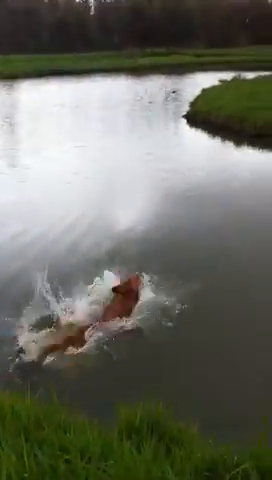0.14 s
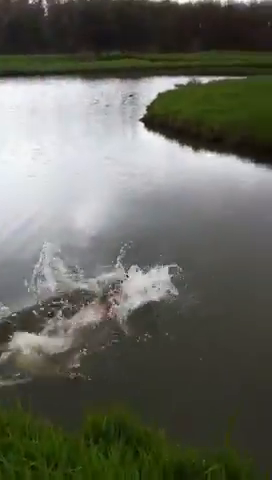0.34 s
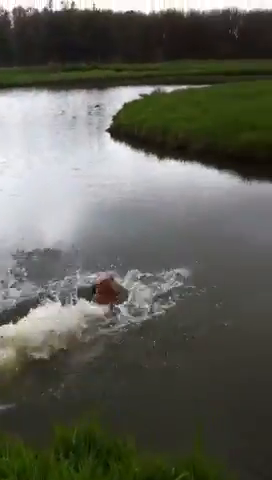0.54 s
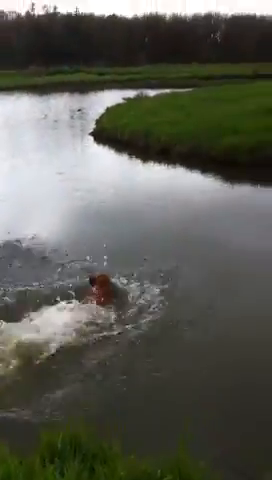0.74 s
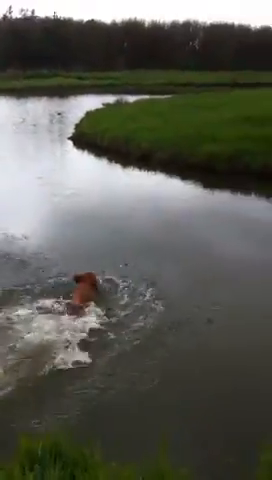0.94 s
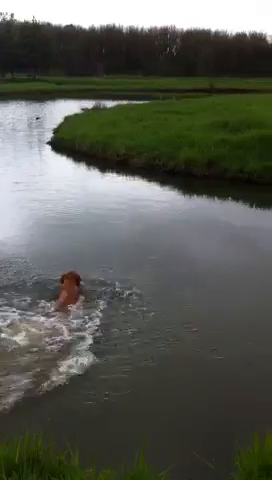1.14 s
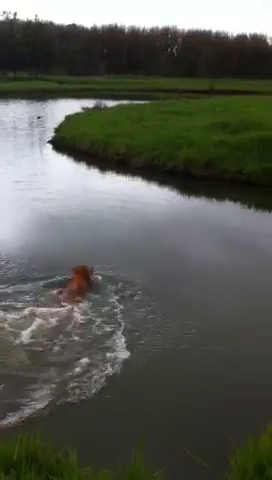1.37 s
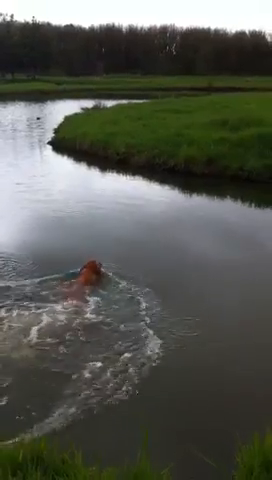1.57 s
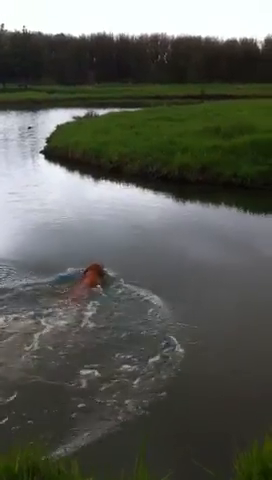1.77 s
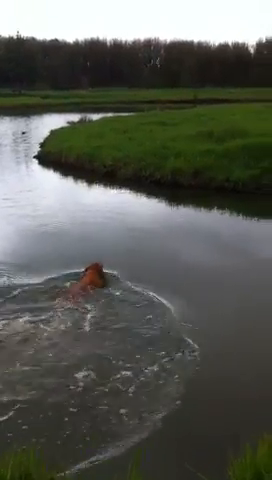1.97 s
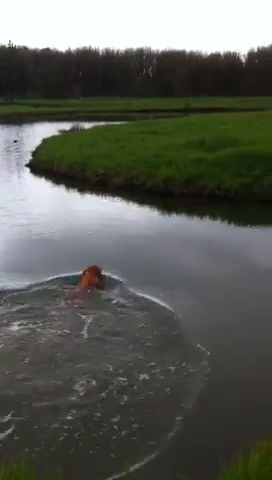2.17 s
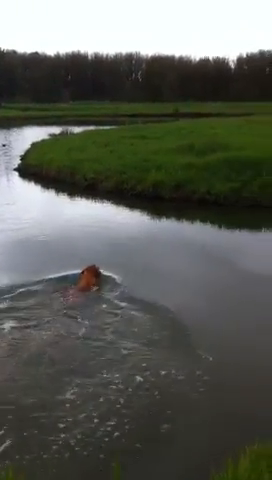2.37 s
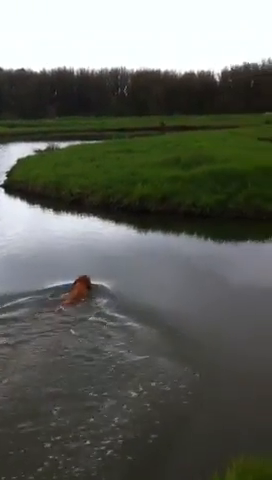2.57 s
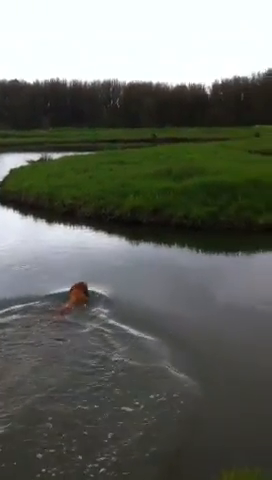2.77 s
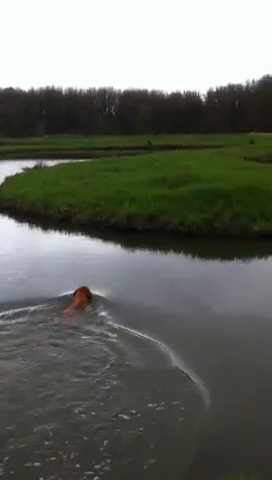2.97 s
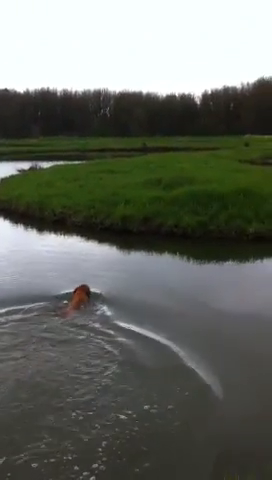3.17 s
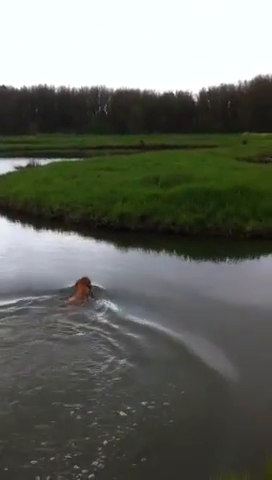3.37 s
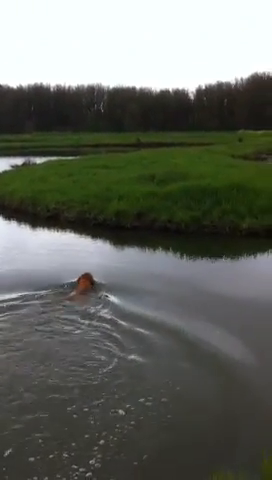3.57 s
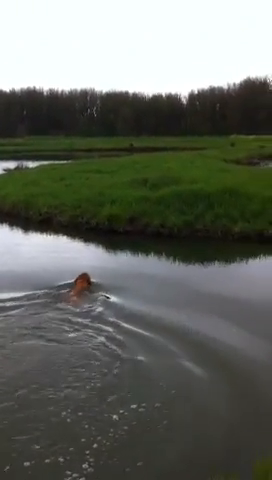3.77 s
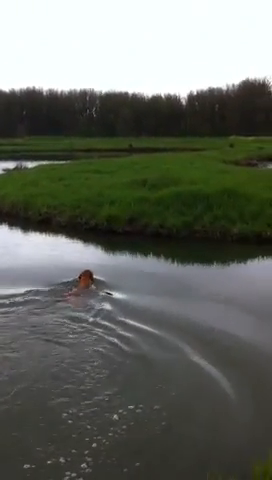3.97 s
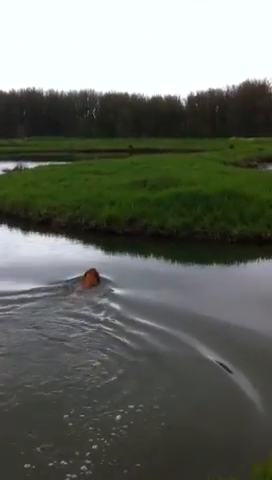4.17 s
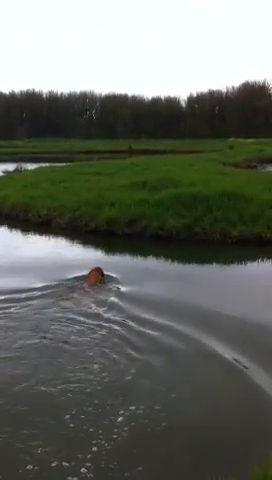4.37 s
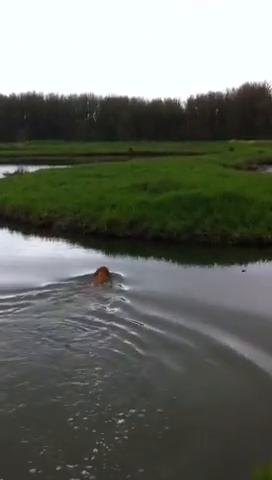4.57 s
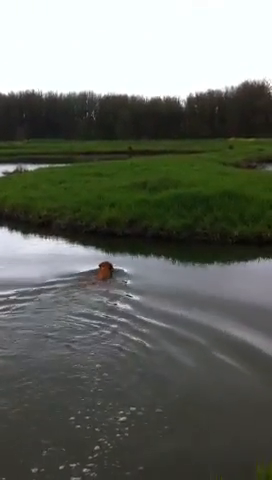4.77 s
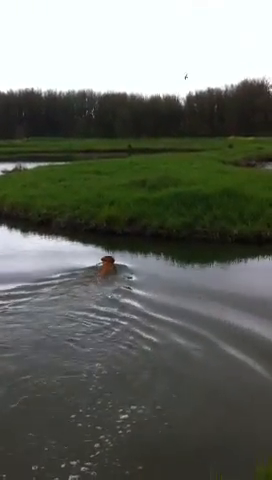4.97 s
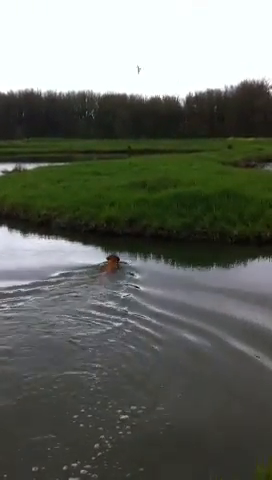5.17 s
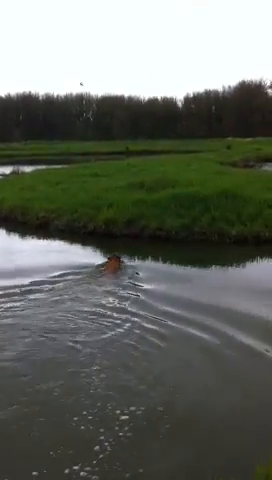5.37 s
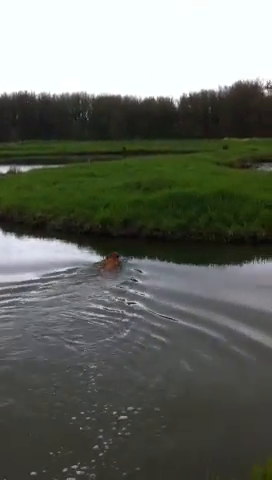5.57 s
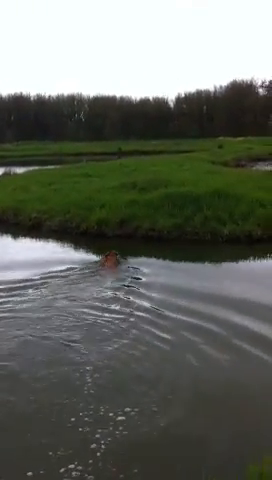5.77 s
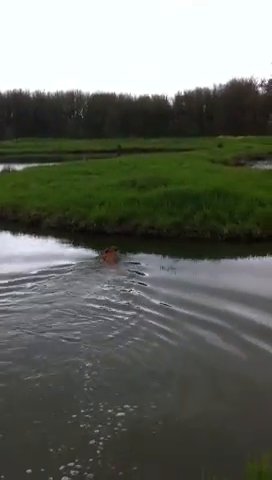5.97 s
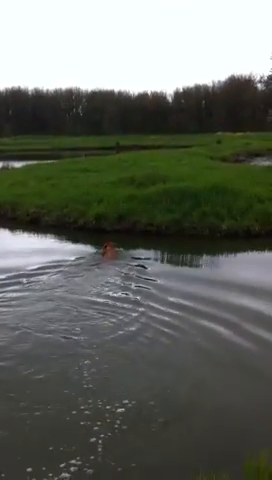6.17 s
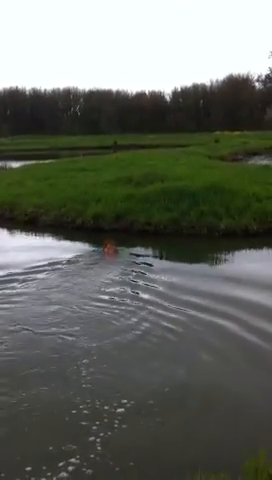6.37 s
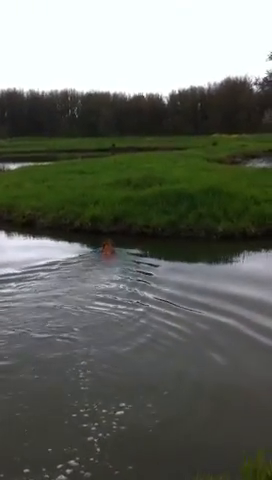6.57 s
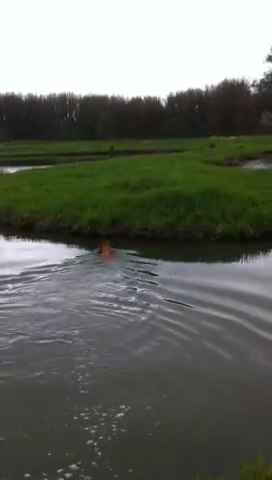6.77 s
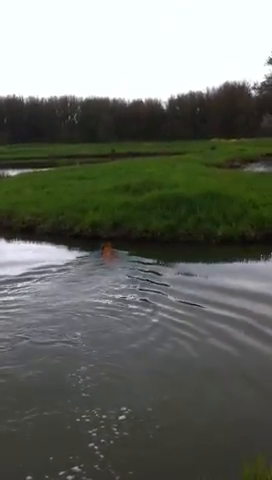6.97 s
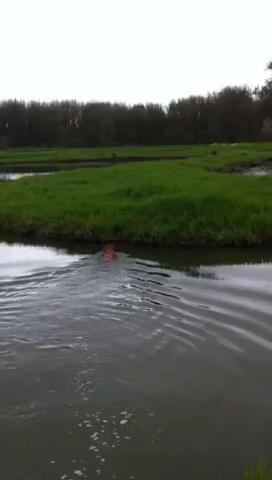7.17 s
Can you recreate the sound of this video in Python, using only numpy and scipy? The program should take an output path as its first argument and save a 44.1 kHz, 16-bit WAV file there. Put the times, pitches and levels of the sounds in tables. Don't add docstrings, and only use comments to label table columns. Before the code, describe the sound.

Over a low, distant road hum, a dog hits pond water almost at once: a hard crack, a second slap, then a deep gulping boom and a rush of spray. Within about a second it thins to drops and foam fizz. Soft paddling sloshes and drips recede, an engine drones faintly, and a marsh bird whistles sharply near the end. Outdoors, one phone microphone a few metres away.

```python
import sys
import numpy as np
from scipy import signal
from scipy.fft import rfft, irfft, next_fast_len
from scipy.io import wavfile
from scipy.ndimage import uniform_filter1d, map_coordinates

SR = 44100
rng = np.random.default_rng(int(sys.argv[2]) if len(sys.argv) > 2 else 0)


def wav_record(signal):
    frames = np.transpose(np.atleast_2d(signal))
    bounded = np.clip(frames, -1, 1)
    quanta = np.round(bounded * 32767).astype(np.int16)
    wavfile.write(sys.argv[1], SR, quanta)


def natural_amplitude(level_db):
    exponent = np.asarray(level_db, float) / 20
    return 10 ** exponent


N = 318731

# peak t/s, boom level/dB, spray
# level/dB
SURGES = [(0.19, -44, -43.5), (0.23, -44, -56), (0.29, -43, -64), (0.34, -31.5, -58),
          (0.374, -34, -58), (0.43, -50, -47.5), (0.5, -36.5, -43), (0.58, -58, -51),
          (0.65, -60, -44), (0.72, -61, -43.5), (0.8, -62, -50), (1.14, -65, -51), (1.74, -70, -58),
          (1.79, -67, -67)]
SURGE_RISE_S = 0.039


def unit(x):
    return x / np.sqrt(np.mean(x ** 2) + 1e-20)


def curves(rows, outside=-120):
    s, *cols = np.transpose(rows)
    t = np.arange(N) / SR
    return [np.interp(t, s, c, outside, outside) for c in cols]


def coloured(x, spectrum):
    m = next_fast_len(len(x) + 8192)
    hz, db = np.transpose(spectrum)
    log_hz = np.log(np.fft.rfftfreq(m, 1 / SR) + 1)
    gain = natural_amplitude(np.interp(log_hz, np.log(hz + 1), db, -120, -120))
    return unit(irfft(rfft(x, m) * gain, m)[:len(x)])


def wobble(rate_hz):
    knots = rng.standard_normal(int(N * rate_hz / SR) + 4)
    return map_coordinates(knots, [np.arange(N) * rate_hz / SR])


def patchy(depth_db):
    z = signal.stft(rng.standard_normal(N + 512), nperseg=512)[2]
    field = uniform_filter1d(rng.standard_normal(z.shape), size=6, axis=0)
    field = uniform_filter1d(field, size=8, axis=1)
    return unit(signal.istft(z * natural_amplitude(depth_db * unit(field)), nperseg=512)[1][:N])


def grains(count, size, centre_hz, spread, cycles, scatter_db):
    when, luck = rng.random((count, 2)).T
    hz = np.clip(centre_hz * np.exp(spread * rng.standard_normal(count)), 100, 15000)[:, None]
    turns = hz * np.arange(size) / SR
    wave = np.sin(2 * np.pi * turns * (1 + 0.058 * turns / cycles))
    wave = wave * np.exp(-turns / cycles) * (1 - np.exp(-turns / 0.12))
    wave = wave * natural_amplitude(-scatter_db * np.log(np.maximum(luck, 1 / 30)))[:, None]
    wave = wave * (hz * (1 + 0.24 * turns / cycles) < SR / 2.3)
    at = (when * N).astype(int)[:, None] + np.arange(size)
    return unit(np.bincount(at.ravel(), wave.ravel(), N + size)[:N])


def add(out, s, x):
    part = out[round(s * SR):][:len(x)]
    part += x[:len(part)]


def glide(hz, rise, life_s):
    u = np.arange(int(life_s * SR)) / (life_s * SR)
    return np.sin(2 * np.pi * hz * life_s * (u + rise * u * u / 2)), u


def swells(rows):
    t, power = np.arange(N) / SR, 1e-12
    for s, rise_s, hold_s, db, fall_db_per_s in rows:
        short_db = 15 * np.clip(1 - (t - s) / rise_s, 0, 1)
        short_db = short_db + fall_db_per_s * np.clip(t - s - rise_s - hold_s, 0, None)
        power = power + natural_amplitude(db - short_db) ** 2 * (t > s)
    return 10 * np.log10(power)


def bursts(tops, rise_s, fall_db_per_s):
    return [(s - rise_s, rise_s, 0, db, fall_db_per_s) for s, db in tops]


def scattered(x, t60_s):
    t = np.arange(SR // 3) / SR
    haze = rng.standard_normal(len(t)) * natural_amplitude(-60 * t / t60_s)
    return signal.fftconvolve(x, haze / np.linalg.norm(haze))[:N]


def marsh():
    # t/s, level/dB
    road = [
        (2.2, -50.5),
        (2.87, -52),
        (3.15, -50.5),
        (4.4, -50.5),
        (6.67, -51.5),
        (7.23, -51.5),
    ]
    # f/Hz, level/dB
    hum_band = [(15, -50), (30, -11), (50, -14.5), (80, -6.5), (125, 0), (177, 0), (253, -7), (372, -10),
                (404, -13), (515, -4), (772, -1.5), (837, -3), (1360, -9.5), (2340, -24), (2530, -26),
                (3500, -29), (7260, -31), (15900, -34)]
    # f/Hz, level/dB
    engine_band = [(110, -41), (150, -1.5), (200, -3), (250, -9.5), (300, -40)]
    # start t/s, rise/s, hold/s, level/dB, fall/(dB/s)
    passing = [
        (1.2, 0.73, 0.99, -62, 5.8),
        (4.6, 0.27, 0.23, -69.5, 12),
    ]
    level_db, = curves(road, outside=None)
    hum = natural_amplitude(level_db - 1.0 + 0.47 * wobble(2.964)) * coloured(patchy(0.96), hum_band)
    return hum + natural_amplitude(swells(passing)) * coloured(rng.standard_normal(N), engine_band)


def bird():
    # t/s, length/s, start f/Hz, end f/Hz, level/dB
    notes_sung = [(2.3, 0.044, 3750, 3750, -66), (2.838, 0.07, 3950, 3760, -64.5),
                  (6.566, 0.032, 5330, 5300, -62), (6.562, .04, 5640, 5560, -65),
                  (6.62, 0.022, 4650, 4650, -69), (6.652, 0.055, 3530, 3490, -70),
                  (6.871, 0.02, 4160, 4480, -57), (6.888, 0.015, 4600, 4250, -57),
                  (6.894, 0.0143, 4330, 3400, -58), (6.872, .05, 5480, 5480, -70),
                  (6.865, 0.07, 6080, 6100, -71), (6.997, 0.06, 2235, 2180, -63),
                  (6.995, 0.06, 2410, 2500, -66), (7.078, 0.08, 3730, 3700, -68.5),
                  (7.16, 0.066, 3720, 3780, -72), (7.084, 0.1, 3085, 3125, -70)]
    # delay/s, level/dB
    bank = [
        (0.041, -21),
        (0.086, -30),
    ]
    song, rasp = np.zeros(N), wobble(260)
    for s, life_s, start_hz, end_hz, db in notes_sung:
        tone, u = glide(start_hz, end_hz / start_hz - 1, life_s)
        depth = np.clip(start_hz / 4200 - 0.85, 0.08, 0.3) + 0.2 * (db < -61)
        rough = 1 + depth * rasp[round(s * SR):][:len(u)]
        tone, u = tone[:len(rough)], u[:len(rough)]
        attack = np.clip(u * life_s / 0.012, 0, 1)
        release = np.clip((1 - u) * life_s / 0.0047, 0, 1)
        add(song, s, natural_amplitude(db - 31 * u * life_s) * tone * rough * attack * release)
    song = song * natural_amplitude(1.1 * wobble(40))
    out = song + natural_amplitude(-6.0) * scattered(song, t60_s=0.5)
    for delay_s, db in bank:
        add(out, delay_s, natural_amplitude(db) * song)
    return out


def loud_whistles():
    # t/s, f/Hz, level/dB
    tracks = [
        [(6.49, 1960, -72), (6.503, 1920, -60), (6.522, 1841, -48.5), (6.542, 1830, -47.5), (6.556, 1845, -55),
         (6.566, 1850, -65), (6.58, 1845, -60), (6.6, 1840, -67), (6.64, 1835, -73)],
        [(6.718, 1920, -72), (6.73, 1900, -60), (6.761, 1827, -51), (6.827, 1865, -51.5), (6.845, 1894, -57),
         (6.857, 1885, -50.5), (6.868, 1890, -57), (6.935, 1865, -61), (6.958, 1840, -74)],
        [(6.6135, 3200, -66), (6.6155, 3260, -55), (6.618, 3350, -68), (6.621, 3450, -60), (6.626, 3380, -70)],
        [(6.6195, 3130, -68), (6.621, 3080, -50), (6.628, 3120, -52), (6.633, 3095, -47.5), (6.65, 3070, -46),
         (6.655, 3080, -47), (6.659, 3120, -58), (6.67, 3110, -66)],
        [(6.671, 3110, -68), (6.674, 3100, -56), (6.684, 3084, -54), (6.695, 3090, -56), (6.699, 3100, -70),
         (6.704, 3080, -62), (6.715, 3075, -69), (6.79, 3090, -72), (6.85, 3120, -75)],
    ]
    out = np.zeros(N)
    for rows in tracks:
        hz, db = curves(rows)
        tone = np.sin(2 * np.pi * np.cumsum(np.abs(hz)) / SR)
        out = out + natural_amplitude(uniform_filter1d(db, size=40) + 1.4 * wobble(70)) * tone
    return out + natural_amplitude(-15) * scattered(out, t60_s=0.6)


def nose():
    # t/s, f/Hz, level/dB
    high = [
        (1.65, 10200, -78),
        (1.665, 10600, -67),
        (1.68, 11050, -68),
        (1.72, 11550, -73),
        (1.77, 11850, -67),
        (1.8, 11400, -67),
        (1.845, 11480, -66),
        (1.885, 11150, -76),
    ]
    # t/s, f/Hz, level/dB
    late = [
        (1.895, 11100, -73),
        (1.91, 10800, -70),
        (1.945, 10550, -68),
        (1.98, 10380, -65),
        (2.005, 10020, -68),
        (2.03, 9650, -72),
        (2.05, 9300, -79.5),
    ]
    # t/s, f/Hz, level/dB
    low = [
        (1.655, 9600, -81),
        (1.68, 10350, -69),
        (1.71, 10350, -75),
        (1.75, 10900, -68),
        (1.8, 10800, -70),
        (1.86, 10450, -68),
        (1.9, 10280, -68),
        (1.95, 10080, -72),
        (2.0, 9960, -78),
    ]
    out = np.zeros(N)
    for rows in (high, late, low):
        hz, db = curves(rows)
        phase = 2 * np.pi * np.cumsum(np.abs(hz) * (1 + 0.0025 * wobble(120))) / SR
        level = natural_amplitude(uniform_filter1d(db, size=300) + 5.5 + 1.5 * wobble(69.6))
        out = out + level * (1 + 0.36 * wobble(500)) * np.sin(phase)
    return out


def bubbles():
    # f/Hz, level/dB
    churn_band = [(280, -30), (420, -2), (650, 0), (950, -6), (1300, -30)]
    # start t/s, rise/s, hold/s, level/dB, fall/(dB/s)
    tumble = [
        (0.165, 0.03, 0.21, -48, 120),
        (0.46, 0.03, 0.05, -51, 120),
    ]
    # start t/s, rise/s, hold/s, level/dB, fall/(dB/s)
    wake_bubbles = [
        (1.2, 0.5, 2.5, -76.5, 3),
    ]
    small = grains(count=2000, size=500, centre_hz=600, spread=0.396, cycles=4.5, scatter_db=2.0)
    churn = coloured(patchy(1.5) + 0.6 * small, churn_band)
    plinks = grains(count=260, size=260, centre_hz=4300, spread=0.45, cycles=7.7, scatter_db=2.5)
    return natural_amplitude(swells(tumble)) * churn + natural_amplitude(swells(wake_bubbles)) * plinks


def spray():
    # start t/s, rise/s, hold/s, level/dB, fall/(dB/s)
    sheet = [
        (0.088, 0.0017, 0.001, -47, 2300),
        (-0.01, 0.0035, 0.1, -66, 300),
        (0.09, 0.0033, 0.038, -54, 360),
        (0.1255, 0.0017, 0.0034, -41, 330),
        (0.13, 0.022, 0.052, -43, 100),
        (0.14, 0.18, 0.57, -47.5, 25.7),
        (1.0, 0.3, 0.61, -66.5, 9.5),
    ]
    # start t/s, rise/s, hold/s, level/dB, fall/(dB/s)
    wake = [
        (1.97, 0.4, 0.085, -71.5, 1.5),
    ]
    # peak t/s, level/dB
    strokes = [(2.341, -62), (2.6, -66), (2.9, -63.5), (3.509, -67), (3.58, -81), (3.7, -73), (4.04, -62),
               (4.28, -64), (4.59, -64), (4.87, -73), (5.12, -69), (5.25, -70), (5.47, -75), (5.74, -65),
               (6.3, -71), (6.48, -80), (6.574, -67), (6.742, -75), (7.055, -76)]
    # start t/s, rise/s, hold/s, level/dB, fall/(dB/s)
    foam_swells = [
        (1.2, 0.55, 0.3, -65, 2.9),
        (2.7, 0.09, 0.47, -65, 170),
        (4.1, 0.2, 0.4, -77, 40),
    ]
    # f/Hz, level/dB
    mist_band = [(880, -3.5), (1500, -3.5), (1850, -7), (2340, -4.5), (3340, -6.5), (3610, -7.5),
                 (5640, -4), (8280, -10), (10300, -3.5), (13700, -11), (15900, -15)]
    # f/Hz, level/dB
    paddle_band = [(710, -24), (1200, 0.5), (1400, -13), (1710, -21), (1930, -2), (3350, -15.5),
                   (4840, -12), (10400, -17), (15900, -30)]
    # f/Hz, level/dB
    fizz_band = [(6500, -42), (8600, -9.5), (10300, -4), (11600, -3), (12600, -6), (13800, -11.5),
                 (15800, -11)]

    def crackle():
        return grains(count=16000, size=56, centre_hz=6180, spread=0.658, cycles=3.5, scatter_db=2.0)

    surge_tops = [(s, db) for s, _, db in SURGES]
    sheet_db = swells(sheet + bursts(surge_tops, SURGE_RISE_S, fall_db_per_s=300))
    paddling_db = swells(wake + bursts(strokes, rise_s=0.076, fall_db_per_s=208))
    flutter_db = 0.45 * wobble(16.1) + 0.55 * wobble(45.6)
    falling = natural_amplitude(sheet_db + 3.5 + flutter_db) * coloured(patchy(1.0) + 0.54 * crackle(), mist_band)
    slosh = coloured(patchy(3.2) + 0.41 * crackle(), paddle_band)
    paddling = natural_amplitude(paddling_db + 0.5 + 3.3 * wobble(90)) * slosh
    fizz = coloured(patchy(2.0) + 0.68 * crackle(), fizz_band)
    foam = natural_amplitude(swells(foam_swells) - 3 + 0.8 * wobble(21.8)) * fizz
    blips = grains(count=500, size=300, centre_hz=3800, spread=0.493, cycles=6.1, scatter_db=3.0)
    return falling + paddling + foam + natural_amplitude(np.maximum(paddling_db, sheet_db) - 10.5) * blips


def drops(table, colour, turns):
    out, t = np.zeros(N), np.arange(400) / SR
    hiss = coloured(rng.standard_normal(N + len(t)), colour)
    for s, db, hz, share in table:
        share = np.clip(share, 0, 1)
        tick = hiss[round(s * SR):][:len(t)] * np.exp(-t / 0.0022) * (1 - np.exp(-t / 0.00039))
        ring = np.sin(2 * np.pi * hz * t * (1 + 8 * t))
        ring = ring * np.exp(-t * hz / turns) * (1 - np.exp(-t / 0.00019))
        both = share * ring / np.abs(ring).max() + (1 - share) * tick / np.abs(tick).max()
        add(out, s + 0.00087, natural_amplitude(db) * both)
    return out


def droplets():
    # t/s, peak level/dB, f/Hz, ring share/1
    splash = [(0.131, -38, 3200, 0.6), (0.575, -35, 5010, 0.4), (0.5865, -31, 5020, 0.5),
              (1.047, -44, 2390, 0), (1.0849, -39, 5170, 0.75), (1.1406, -37, 5750, 0.8),
              (1.1445, -41, 4840, 0.8), (1.396, -46, 5990, 0.7), (1.2835, -38, 4070, 0.26),
              (1.3203, -40, 2345, 0.2), (1.5783, -50.5, 2690, 0), (1.6222, -46, 2700, 0.6),
              (1.7375, -45, 3210, 0.5), (1.7398, -40, 6030, 0.8), (1.7915, -40.5, 2650, 0.3),
              (2.3328, -47, 2650, 0.1), (2.3375, -49, 6310, 0.7), (2.3565, -47, 2600, 0.2),
              (2.6952, -49, 2750, 0.8), (2.816, -56, 5200, 0.7), (2.8795, -53, 5470, 0.7),
              (2.918, -52, 4300, 0.8), (2.91, -49, 2310, 0.4), (3.0355, -45.5, 6270, 0.55),
              (3.4913, -46.5, 2590, 0.24), (3.499, -53, 6800, 0.6), (3.6865, -54, 2780, 0.8),
              (3.697, -50, 3160, 0.3), (3.7666, -50.5, 2430, 0.95), (4.0082, -53, 3930, 0.6),
              (4.018, -52, 2100, 0.5), (4.0374, -44, 2500, 0.5), (4.061, -55, 3200, 0.8),
              (4.1, -56, 2900, 0.7), (4.2495, -50, 6520, 0.4), (4.2781, -50, 2200, 0.8),
              (4.282, -53, 3000, 0.7), (4.44, -58, 5400, 0.8), (4.476, -56, 3500, 0.8),
              (4.4885, -54, 5560, 0.6), (4.5804, -42.5, 2620, 0.7), (4.581, -49, 3350, 0.8),
              (4.6204, -50, 3000, 0.45), (4.8703, -47, 4020, 0.7), (5.0936, -52, 2560, 0.7),
              (5.1185, -54, 3290, 0.7), (5.1511, -53, 4720, 0.6), (5.1625, -53, 4760, 0.7),
              (5.745, -48, 4110, 0.5), (6.2945, -46, 3680, 0.4), (6.4726, -51, 3220, 0.2)]
    # t/s, peak level/dB, f/Hz, ring share/1
    further_drops = [(1.1278, -39, 5230, 0.4), (1.3475, -41, 2930, 0.7), (1.4492, -52, 3200, 0.6),
                     (1.9504, -51, 2090, 0.3), (2.0194, -50, 2020, 0.4), (2.2378, -52, 2170, 0.4),
                     (2.315, -48, 2500, 0.8), (2.4922, -50, 5880, 0.5), (2.606, -52, 2040, 0.4),
                     (2.6504, -48, 2170, 0.4), (2.8094, -54, 1990, 0.5), (2.8924, -48, 3140, 0.7),
                     (2.9394, -47, 2030, 0.5), (3.3099, -56, 2050, 0.4), (3.4161, -48, 2100, 0.4),
                     (3.4466, -48, 2110, 0.4), (3.5094, -55, 2590, 0.4), (3.5514, -57, 2000, 0.4),
                     (3.5698, -51, 2600, 0.5), (3.6144, -58, 2360, 0.4), (3.9094, -50, 2000, 0.4),
                     (3.9644, -49, 2480, 0.4), (4.0024, -47.5, 2130, 0.6), (4.1725, -52, 3080, 0.7),
                     (4.2024, -54, 2140, 0.4), (4.2994, -57, 2050, 0.4), (4.5176, -53, 3830, 0.8),
                     (4.5314, -54, 2100, 0.4), (5.0704, -53, 2130, 0.4), (5.2354, -58, 2040, 0.4),
                     (5.4745, -51, 4290, 0.7), (5.6014, -57, 2000, 0.4), (5.6707, -53, 2340, 0.4),
                     (6.2764, -52, 2090, 0.4), (6.57, -50, 5300, 0.4), (6.7414, -50, 3070, 0.4),
                     (6.9194, -55, 4310, 0.4), (7.0194, -56, 2190, 0.4), (7.0544, -56, 2180, 0.4)]
    # t/s, peak level/dB, f/Hz, ring
    pops = [(0.1262, -31, 9150, 0.4), (0.1512, -28, 11500, 0.5), (0.581, -30.5, 9900, 0.5),
            (0.6145, -32, 11000, 0.7), (0.7801, -33, 10400, 0.3), (0.806, -34, 11800, 0.5),
            (0.9274, -35, 9700, 0.5), (1.044, -37.5, 10300, 0), (1.1882, -38.5, 9740, 0.5),
            (1.3233, -34, 9910, 0.66), (1.3548, -45, 10300, 0.57), (1.7399, -47, 9030, 0.3),
            (1.795, -50, 9300, 0.4), (2.6793, -52, 11300, 0.7), (2.9144, -48, 9800, 0.6),
            (3.4146, -53, 10900, 0.6), (3.777, -53, 10200, 0.5), (4.1744, -50, 11600, 0.7),
            (4.6767, -52, 12000, 0.7), (4.8713, -51, 9680, 0.5), (5.235, -53, 8970, 0.6),
            (6.1693, -46.5, 13500, 0.55), (6.7695, -49, 15000, 0.7)]
    # f/Hz, level/dB
    dull = [(700, -34), (1500, 4.5), (4000, -3), (7000, -3.5), (9000, -24)]
    # f/Hz, level/dB
    bright = [(5500, -23), (8000, 1), (11000, 3), (15800, -12)]
    out = natural_amplitude(3.0) * drops(splash, dull, turns=2.2)
    out = out + drops(further_drops, dull, turns=3.5)
    return out + natural_amplitude(3.0) * drops(pops, bright, turns=6.7)


def slaps():
    # t/s, peak level/dB, thump re peak/dB
    paws = [
        (0.0841, -13, -7),
        (0.1257, -20.5, -27),
        (0.1425, -32, 1),
    ]
    # f/Hz, level/dB
    crack_band = [(1470, -11), (2500, -12), (3200, -12), (3800, -6), (4400, 9), (6000, 9.5), (7800, -2),
                  (9920, 3.5), (15900, -18)]
    out, t = np.zeros(N), np.arange(800) / SR
    for s, db, low_db in paws:
        shape = np.exp(-np.abs(t - 0.0025) / 0.001) + 0.1 * np.exp(-t / 0.0062) * (t > 0.0025)
        crack = coloured(rng.standard_normal(len(t)), crack_band) * shape
        crack[round(0.0025 * SR):][:2] += 2.0 * np.array([1, -1])
        thump = np.sin(2 * np.pi * 1800 * t) * np.exp(-((t - 0.0026) / 0.00041) ** 2)
        thump = thump + 0.48 * np.sin(2 * np.pi * 800 * t) * np.exp(-((t - 0.003) / 0.0011) ** 2)
        add(out, s - 0.001, natural_amplitude(db) * crack / np.abs(crack).max() + natural_amplitude(db + low_db) * thump)
    return out


def plunge():
    # start t/s, rise/s, hold/s, level/dB, fall/(dB/s)
    boom = [
        (0.12, 0.11, 0.13, -38.5, 45),
        (0.5, 0.092, 0.25, -55, 10.5),
    ]
    # start t/s, rise/s, hold/s, level/dB, fall/(dB/s)
    boil = [
        (0.14, 0.049, 0.025, -38, 270),
        (0.093, 0.15, 0.18, -41.5, 12.8),
    ]
    # t/s, f/Hz, pitch rise/1, life/s, level/dB
    gulps = [(0.121, 126, 0.21, 0.03, -41.5), (.175, 275, 0.11, 0.024, -35), (.215, 201, 0.21, 0.029, -36),
             (.215, 430, 0.079, 0.025, -42), (.278, 210, 0.36, 0.027, -33), (.258, 740, -0.28, .058, -37.5),
             (.3, 149, 0.26, 0.047, -33), (.35, 187, -0.018, 0.031, -33), (.21, 374, 0.25, 0.0275, -38),
             (.24, 267, 0.22, 0.029, -42), (.315, 550, 0.05, 0.035, -40), (0.33, 520, 0.1, 0.025, -47),
             (.325, 249, -0.11, 0.041, -30), (.35, 590, -0.075, 0.039, -36.5),
             (.335, 760, 0.034, 0.028, -35), (.425, 790, 0.08, 0.025, -44), (.345, 363, 0.023, 0.03, -33.5),
             (.435, 223, 0.066, 0.025, -35.5), (.468, 610, -0.099, 0.031, -36),
             (.485, 190, 0.0057, 0.024, -39), (.525, 590, 0.27, 0.048, -44), (.49, 860, 0.042, 0.022, -37),
             (1.42, 880, 0.027, 0.029, -47), (2.339, 1300, 0.15, 0.011, -43),
             (2.603, 1600, 0.43, 0.006, -48), (2.905, 2050, 0.09, 0.009, -50.5),
             (4.0, 1900, 0.047, 0.01, -53), (4.531, 1950, 0.11, 0.0076, -53),
             (3.141, 1380, -0.052, 0.015, -49), (4.562, 1430, 0.025, 0.013, -47),
             (0.108, 1400, 0.1, 0.008, -42), (0.565, 900, 0.2, 0.022, -42), (0.7, 640, 0.05, 0.02, -44),
             (0.755, 790, 0.056, 0.02, -41), (0.922, 930, 0.024, 0.018, -44),
             (3.423, 1300, 0.05, 0.01, -51), (4.037, 1500, 0.3, 0.004, -48), (4.3, 1800, 0.2, 0.005, -53),
             (5.719, 1340, 0.05, 0.01, -51)]
    # f/Hz, level/dB
    froth_band = [(180, -21), (300, -5.5), (797, 1), (1190, -2), (1450, 1), (1970, 0), (2400, 1),
                  (3500, -14), (4550, -18), (7700, -120)]
    # f/Hz, level/dB
    cavity_band = [(60, -58), (100, -17), (160, 1.5), (240, 0.5), (370, -6), (520, -3.5), (700, -63)]
    booms = [(s, db) for s, db, _ in SURGES]
    boils = [(s, min(db, -34) - 8) for s, db in booms]
    cavity_db = swells(boom + bursts(booms, SURGE_RISE_S, fall_db_per_s=420))
    froth_db = swells(boil + bursts(boils, SURGE_RISE_S, fall_db_per_s=420))
    mid_bubbles = grains(count=6000, size=300, centre_hz=905, spread=0.562, cycles=5.4, scatter_db=2.0)
    froth = coloured(patchy(2.2) + 0.73 * mid_bubbles, froth_band)
    cavity = coloured(patchy(2.5), cavity_band)
    out = natural_amplitude(cavity_db - 5.5) * cavity + natural_amplitude(froth_db + 0.93 * wobble(30.34)) * froth
    for s, hz, rise, life_s, db in gulps:
        tone, u = glide(hz, rise, life_s)
        add(out, s, natural_amplitude(db) * tone * np.sin(np.pi * u ** 1.33))
    return out


def scene():
    background = marsh() + bird() + loud_whistles()
    dog = nose() + bubbles() + spray() + droplets() + slaps() + plunge()
    return (background + dog)[None]


def treble_dropouts(x):
    # start t/s, end t/s, above f/Hz, level/dB
    gaps = [
        (0.0705, 0.0795, 2500, -45),
        (0.1135, 0.1235, 3800, -8),
    ]
    t = np.arange(SR // 4) / SR
    for start_s, end_s, hz, db in gaps:
        highpass = signal.butter(8, hz, "high", fs=SR, output="sos")
        treble = signal.sosfiltfilt(highpass, x[:, :len(t)])
        inside = np.clip(np.minimum(t - start_s, end_s - t) / 0.001 + 1, 0, 1)
        x = x - np.pad(treble * inside * (1 - natural_amplitude(db)), [(0, 0), (0, N - len(t))])
    return x


def band_limit(x):
    return signal.sosfilt(signal.butter(12, 16640, fs=SR, output="sos"), x)


def record(dry):
    m = next_fast_len(N)
    hz = np.fft.rfftfreq(m, 1 / SR)
    response = (hz < 15840) / (1 + (48 / (hz + 1)) ** 4)
    kept = irfft(rfft(dry, m) * response, m)[:, :N]
    mix = treble_dropouts(kept)
    return band_limit(mix)


dry = scene()
out = record(dry)
wav_record(out)
```